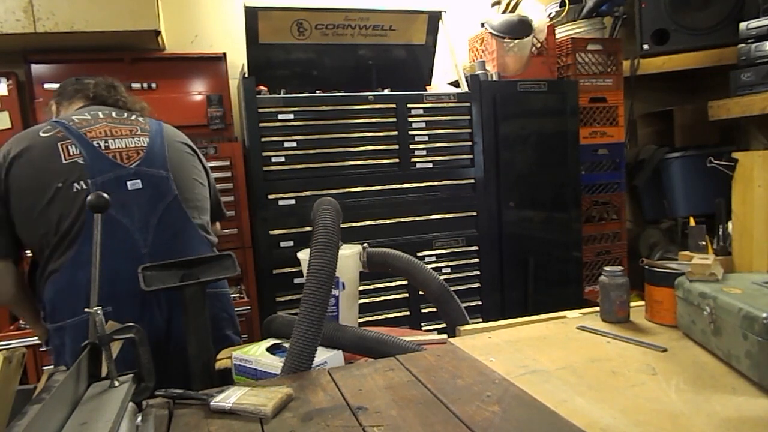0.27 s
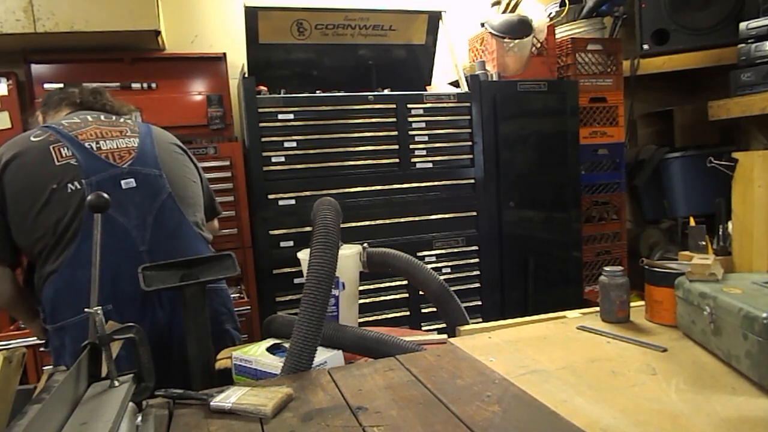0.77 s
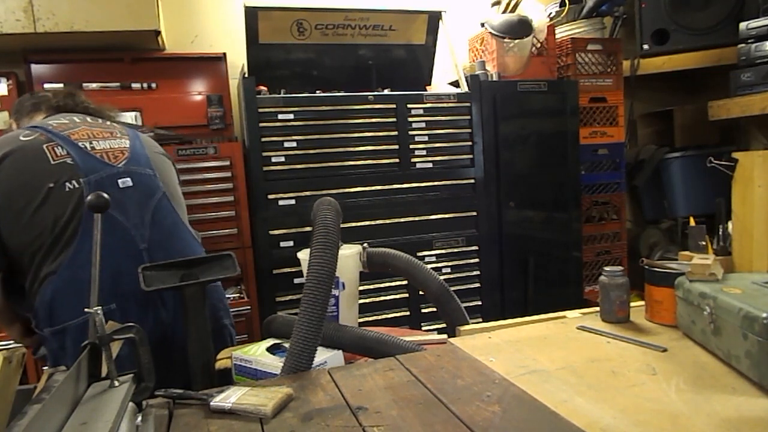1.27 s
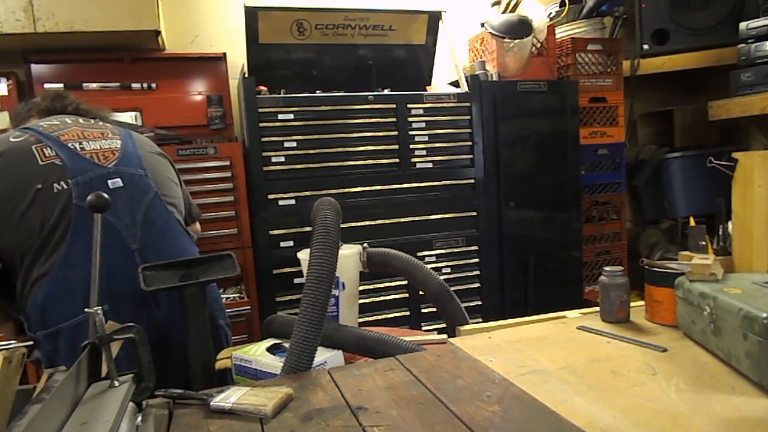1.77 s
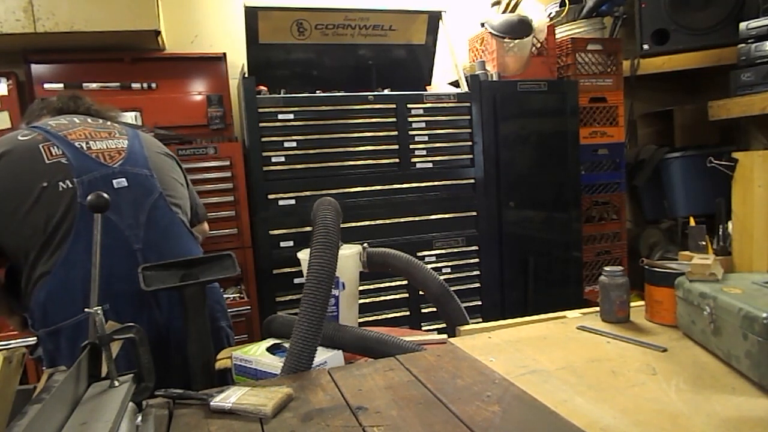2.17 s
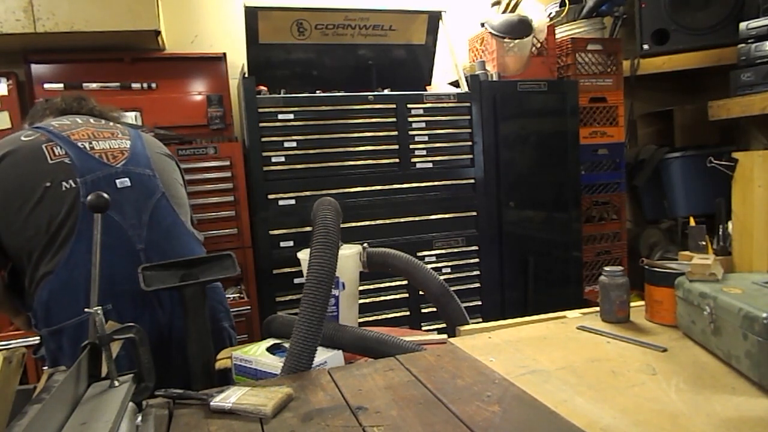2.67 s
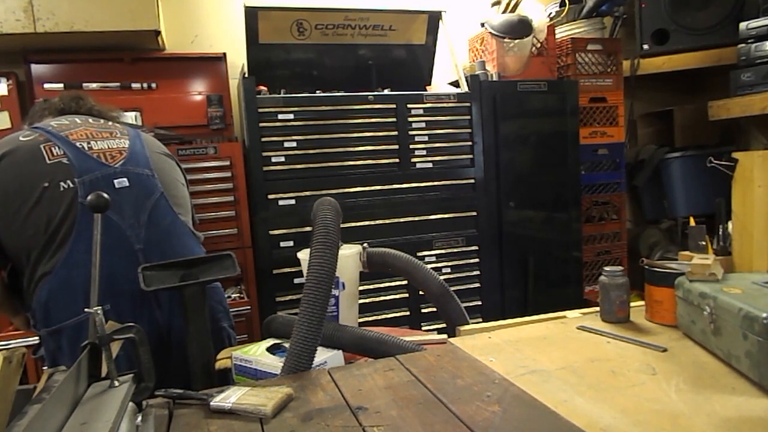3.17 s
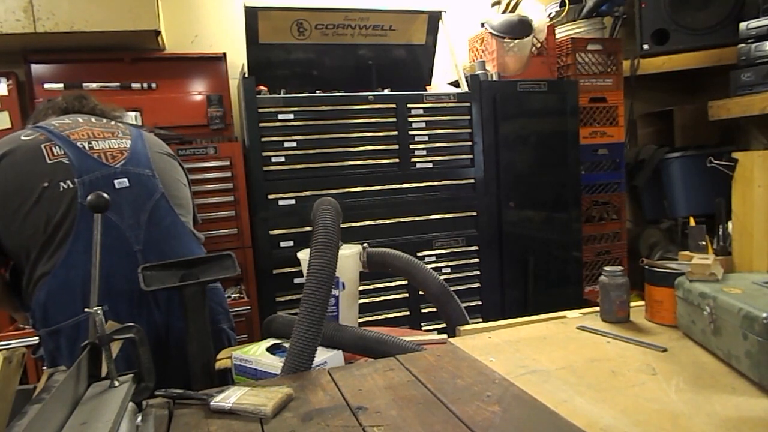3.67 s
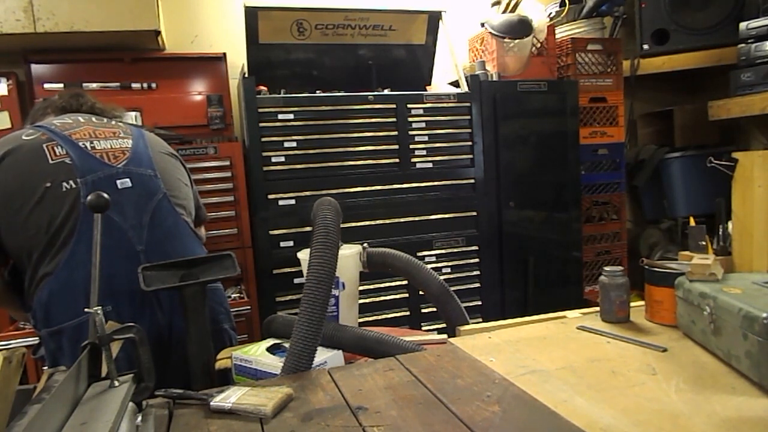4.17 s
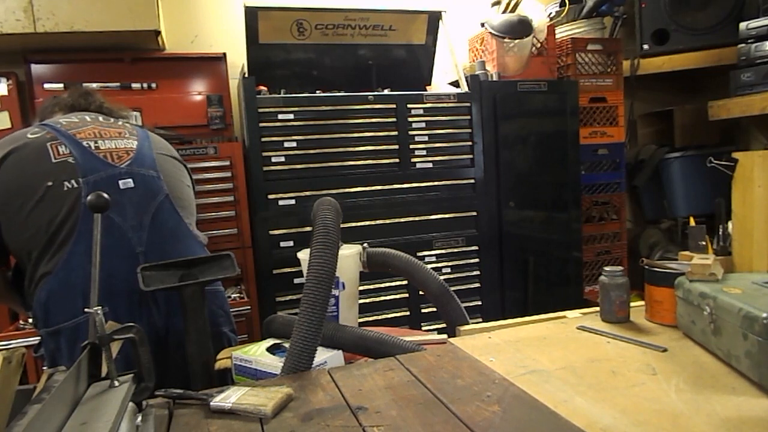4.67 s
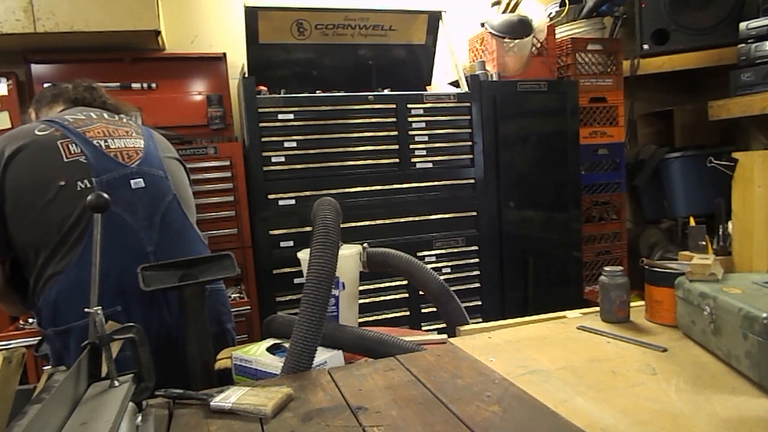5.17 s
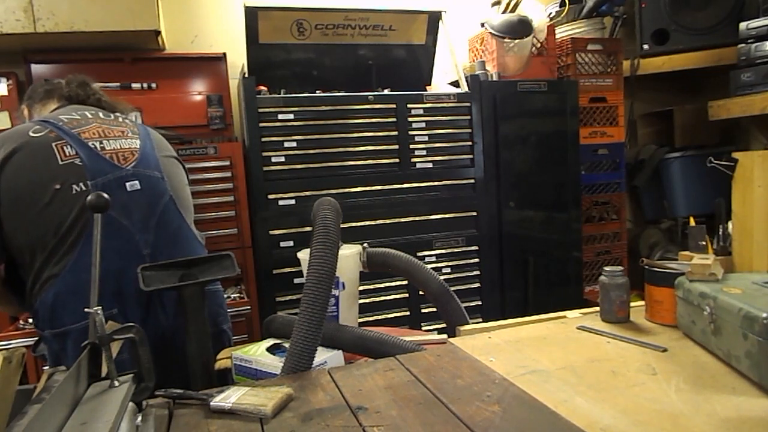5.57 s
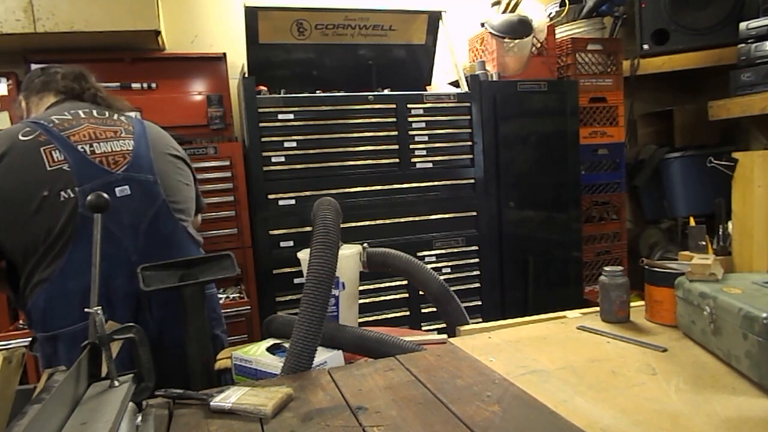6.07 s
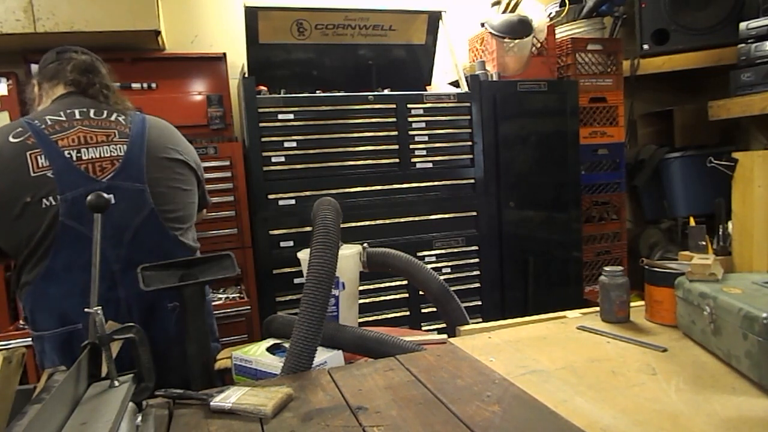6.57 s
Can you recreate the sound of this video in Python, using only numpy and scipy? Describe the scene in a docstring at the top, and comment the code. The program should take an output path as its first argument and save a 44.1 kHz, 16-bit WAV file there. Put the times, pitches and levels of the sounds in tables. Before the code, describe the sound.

Someone sorts metal tools in a steel chest drawer, uneven bursts of clanks and bright chinks, a quiet lull, then a loud closing clatter.

```python
"""A garage, a few metres from a tool chest: steel hand tools are pushed about and dropped in its drawer.
Each knock is a burst of bounces that cracks, scatters, pings and shakes the sheet-metal drawer.
Loose tools and drawer panels ring on as dying sine partials, and a noise tail gives the room.
A thin squeak comes early on; a faint electric hum and coloured fan noise lie below."""
import sys
import numpy as np
from scipy import signal
from scipy.fft import rfft, irfft
from scipy.io import wavfile
from scipy.ndimage import uniform_filter1d, minimum_filter1d

SR = 44100
rng = np.random.default_rng(int(sys.argv[2]) if len(sys.argv) > 2 else 0)


def transcribe(u):
    """Save the signal u as a 16-bit wav file named by the first command-line argument.

    u: samples, shape (n,) or (channels, n), limited to [-1, 1]; the rate is SR.
    q: integer samples, one column per channel.
    """
    v = np.clip(np.atleast_2d(u).T, -1, 1)
    q = np.round(v * 32767).astype(np.int16)
    wavfile.write(sys.argv[1], SR, q)


N = 301312


def from_db(db):
    """Decibels to amplitude gain."""
    return 10 ** (np.asarray(db) / 20)


def unit_energy(x):
    """Scale so that the squares sum to one over time, averaged over the channels."""
    return x / np.sqrt(np.mean(np.sum(x ** 2, axis=-1)) + 1e-20)


def at_hz(points, hz):
    """Read a table on a log-frequency axis."""
    f, value = np.transpose(points)
    return np.interp(np.log(np.maximum(hz, 1)), np.log(f), value)


def dying(t, t60):
    """Amplitude of a free decay that falls 60 dB in t60 seconds."""
    return np.exp(-np.log(1000) * t / t60)


def band_filter(low_hz, high_hz):
    """Causal band-pass, as filter sections."""
    return signal.butter(3, [low_hz, high_hz], "band", fs=SR, output="sos")


def resonate(x, hz, width_hz):
    """Two-pole resonance with gain one on top."""
    r = np.exp(-np.pi * width_hz / SR)
    feed = np.array([1, 0, -1]) * (1 - r * r) / 2
    back = [1, -2 * r * np.cos(2 * np.pi * hz / SR), r * r]
    return signal.lfilter(feed, back, x)


def coloured(x, points):
    """Apply a smooth tone curve of (pitch_hz, level_db) points."""
    size = x.shape[-1]
    hz = np.fft.rfftfreq(size, 1 / SR)
    return irfft(rfft(x) * from_db(at_hz(points, hz)), size)


# likeness of diffuse sound at the two microphones: pitch_hz [Hz], correlation [-1 to 1]
LIKENESS = [(50, .5), (150, 0.91), (500, 0.93), (1000, 0.98), (2000, .35), (4000, 0.25), (8000, 0.25),
            (14000, -0.26)]
# left-right balance of diffuse sound: pitch_hz [Hz], left_minus_right_db [dB]
BALANCE_DB = [(60, 4), (150, -2.5), (1000, -1.84), (4000, -1), (8000, 1), (13000, 3)]


def diffuse_noise(size):
    """Noise from all sides at two close microphones: alike in the bass, unrelated in the treble."""
    hz = np.fft.rfftfreq(size, 1 / SR)
    sides = np.array([[1], [-1]])   # left, right
    alike = np.clip(at_hz(LIKENESS, hz), -.99, .99)
    mid, side = rfft(rng.standard_normal((2, size)))
    both = np.sqrt(1 + alike) * mid + sides * np.sqrt(1 - alike) * side
    balance = from_db(sides * at_hz(BALANCE_DB, hz) / 2)
    return irfft(both * balance, size)


# electric hum partials: pitch_hz [Hz], level_db [dB, before hum_db]
HUM = [(180, -60.5), (300, -58), (540, -73)]
# tone curve of the fan's rush: pitch_hz [Hz], level_db [dB per Hz, relative]
FAN = [(25, -31), (55, -17), (75, -23), (130, -18.5), (200, -13), (290, -1), (400, -5), (550, -0.5),
       (800, -6), (1220, -3), (1600, -13), (3000, -15.5), (10000, -18), (15500, -21.5)]


def background(hum_db=2, fan_db=-51.5):
    """Mains hum is a few steady sines; the soft rush of a fan is coloured diffuse noise (fan_db RMS)."""
    t = np.arange(N) / SR
    hum = sum(from_db(db + hum_db) * np.sin(2 * np.pi * (hz * t + rng.random())) for hz, db in HUM)
    rush = np.sqrt(N) * unit_energy(coloured(diffuse_noise(N), FAN))   # RMS of one
    return hum + from_db(fan_db) * rush


def bounces(t, rattle_s, per_s=230, uneven_db=5.5):
    """Force of a first contact, then of random uneven bounces that die away."""
    touches = rng.random(len(t)) < per_s / SR
    force = touches * from_db(uneven_db * np.clip(rng.standard_normal(len(t)), -2, 1.5))
    force[0] = 1
    return force * np.exp(-t / (2 * max(rattle_s, 1 / SR)))


def crash(t, force, crack_t60=0.0059, crack_db=-11, scatter_t60=0.22, build_s=0.0043):
    """Every contact cracks, then scatters among countless modes of the pile and the cabinets around it."""
    swell = 1 - np.exp(-t / build_s)
    crack = from_db(crack_db) * unit_energy(dying(t, crack_t60) * swell)
    scatter = unit_energy(dying(t, scatter_t60) * swell)
    power = signal.fftconvolve(force ** 2, crack ** 2 + scatter ** 2)[:len(t)]
    return unit_energy(diffuse_noise(len(t)) * np.sqrt(np.maximum(power, 0)))


def pings(t, force, t60=0.112, build_s=0.0055, count=30):
    """Whichever tools touch add a fresh handful of high, quickly damped bar modes."""
    hz = rng.uniform(5800, 15000, (count, 1))
    mix = rng.standard_normal((2, count))   # strength of each mode at each microphone
    envelope = dying(t, t60) * (1 - np.exp(-t / build_s))
    modes = mix @ np.sin(2 * np.pi * hz * t) * envelope
    return unit_energy(signal.fftconvolve(force[None], modes, axes=1)[:, :len(t)])


# knocks that stand out: start_s [s], strength_db [dB], brightness_db [dB, tilt from boom to chink],
# rattle_s [s, time in which the bounces' power falls to 1/e]
KNOCKS = [(0.292, -28.5, 8.5, .011), (0.38, -38.5, 16, .045), (0.468, -19.5, 18.5, 0.0046),
          (0.474, -15.5, 22, 0.01), (0.558, -22.5, 25.5, 0.023), (1.308, -34.5, 9.5, 0.036),
          (1.37, -32, 4, 0.013), (1.425, -19, 8.5, 0.14), (1.455, -24.5, 22, 0.048),
          (1.534, -16.5, 11, 0.026), (1.595, -20, 19, 0.01), (1.62, -21.5, 14, .006),
          (1.775, -27.5, 9.5, 0.034), (1.82, -27.5, 12.5, 0.0084), (1.93, -31.5, 6.5, 0.053),
          (2.12, -37, 11.5, .004), (2.24, -35.5, 5.5, 0.012), (2.457, -27, 11.5, 0.0089),
          (2.737, -28.5, 11.5, 0.017), (2.754, -26, 8.5, 0.02), (2.876, -31, 16, .03),
          (2.915, -26, 11, 0.014), (3.015, -19, 15, 0.018), (3.051, -20, 20.5, 0.024),
          (3.104, -16, 13, 0.0043), (3.203, -22.5, 20, .012), (3.411, -23, 10.5, 0.051),
          (3.523, -21, 17, 0.014), (3.608, -24.5, 20, .015), (3.63, -21.5, 17.5, 0.013),
          (3.764, -26.5, 12.5, 0.0074), (3.911, -34.5, 18, 0.011), (3.985, -30, 9, 0.0068),
          (4.148, -39.5, 5, .004), (4.725, -38, -0.5, 0.012), (4.873, -38, 1, .003), (4.973, -39, 0, .011),
          (5.028, -38.5, 4, 0.0081), (5.106, -40.5, 9, 0.0046), (5.232, -42.5, -2, 0.0069),
          (5.35, -28.5, 12, 0.0088), (5.552, -36, 3, 0.0026), (5.708, -23.5, 4, 0.022),
          (5.853, -22.5, 12.5, 0.016), (5.98, -32.5, -2, 0.023), (6.087, -26.5, 12.5, 0.033),
          (6.19, -32, 13.5, .05), (6.25, -36, 28, 0.033), (6.308, -21, 16, 0.039), (6.379, -17.5, 8, 0.011),
          (6.417, -11.5, 13.5, .007), (6.48, -16.5, 8, .037), (6.538, -15, 24.5, 0.023),
          (6.59, -19, 13, .029), (6.65, -22.5, 22.5, 0.029)]
# ranges of boom, clank, clack and chink: low_hz [Hz], high_hz [Hz]
RANGES = [(200, 600), (600, 1500), (1500, 5000), (5000, 15500)]
# how strength is shared out, boom to chink: offset_db [dB], share [dB per dB of brightness]
WEIGHTS = [(-.5, -0.39), (0, -0.14), (0.54, 0.13), (0.07, 0.48)]
# resonances of the loaded drawer: pitch_hz [Hz], width_hz [Hz], level_db [dB, against the direct clatter]
DRAWER = [(256, 23, -1.5), (293.3, 21.6, 2), (351, 38, -7), (515, 160, -13.5), (977, 150, -12),
          (1120, 96, -9), (4103, 52, 0), (4560, 37, -9), (8750, 450, -6.5)]
# tone of the clatter at the microphones: pitch_hz [Hz], level_db [dB]
TONE = [(100, -21), (170, -11.5), (240, -3.5), (520, .5), (680, 0.5), (950, 3), (1250, 1), (1450, 0),
        (1900, 2.5), (2900, 0), (4500, 1.5), (5200, -1.5), (7000, 1), (10500, -3), (12500, -5.5),
        (15500, -13.5)]


def clatter(blow_s=0.02, ping_db=-5):
    """Bounces drive tools and drawer; steel on steel is bright, a blow on the drawer floor is dull."""
    t = np.arange(SR // 4) / SR
    filters = [band_filter(low, high) for low, high in RANGES]
    out = np.zeros((2, N + SR))
    for start_s, strength_db, bright_db, rattle_s in KNOCKS + jostles():
        force = bounces(t, rattle_s)
        tools = crash(t, force) + from_db(ping_db) * pings(t, force)
        drawer = sum(from_db(db) * resonate(tools, hz, width) for hz, width, db in DRAWER)
        shaken = tools + drawer
        at = int(start_s * SR)
        for sos, (offset_db, share) in zip(filters, WEIGHTS):
            # each range gets the energy of a steady sound blow_s long
            gain = from_db(strength_db + offset_db + share * bright_db) * np.sqrt(blow_s * SR)
            out[:, at:at + len(t)] += gain * unit_energy(signal.sosfilt(sos, shaken))
    return coloured(out[:, :N], TONE)


# reverberation of the garage: pitch_hz [Hz], t60_s [s]
GARAGE_T60 = [(200, 0.51), (500, 0.75), (1000, 0.64), (3000, 0.59), (6000, 0.52), (14000, 0.34)]


def garage(x, tail_db=-4, build_s=0.004, late_samples=3):
    """The room adds a tail of dying noise bands; sound reaches the right microphone slightly late."""
    t = np.arange(SR) / SR
    noise = diffuse_noise(SR)
    edges = np.geomspace(100, 18000, 9)
    tail = 0
    for low, high in zip(edges, edges[1:]):
        fade = dying(t, at_hz(GARAGE_T60, np.sqrt(low * high)))
        tail = tail + signal.sosfilt(band_filter(low, high), noise) * fade
    tail = unit_energy(tail * (1 - np.exp(-t / build_s)))
    reverb = signal.fftconvolve(x[:1], tail, axes=1)[:, :N]
    left, right = x + from_db(tail_db) * reverb
    return np.array([left, np.pad(right, (late_samples, 0))[:N]])


# Partials of tools and drawer panels that ring out freely.
# Columns of each: pitch_hz [Hz], level_db [dB, before the ring's gain_db]
# a dropped wrench
DROPPED_WRENCH = [(4151, -33), (5868, -36), (7014, -40), (8140, -30), (8247, -38), (8834, -36), (8963, -32),
                  (9367, -38), (9997, -40), (10255, -32), (10670, -31), (10783, -33), (12247, -42),
                  (12769, -40)]
# a small bit
SMALL_BIT = [(10061, -46), (10471, -44.5), (11122, -53)]
# a tapped shank
TAPPED_SHANK = [(4522, -39.5), (8818, -46), (9345, -64), (11843, -51)]
# a tossed wrench
TOSSED_WRENCH = [(2083, -35), (8608, -45), (9378, -36), (9927, -32), (10115, -43), (10788, -39),
                 (14277, -41)]
# a slim wrench
SLIM_WRENCH = [(6148, -44), (9502, -34), (9609, -38), (10788, -40), (11326, -48.5), (14277, -36)]
# a rolling socket
ROLLING_SOCKET = [(5819, -32), (7025, -48), (8603, -40), (10481, -19.5), (12037, -25), (13625, -54)]
# a small socket
SMALL_SOCKET = [(4247, -54), (7278, -59), (8786, -42), (8899, -46), (10874, -56), (12059, -52),
                (12107, -48)]
# a nudged bit
NUDGED_BIT = [(8355, -47.5)]
# a short wrench
SHORT_WRENCH = [(7784, -46), (9765, -41), (11176, -44), (11283, -47), (11682, -57)]
# a lifted shank
LIFTED_SHANK = [(4500, -52.5), (4667, -63)]
# a shifted socket
SHIFTED_SOCKET = [(4102, -39.5), (6772, -46), (9895, -37), (9927, -45)]
# a heavy tool
HEAVY_TOOL = [(893.6, -18), (1647, -28), (1712, -26), (2347, -23), (2412, -40), (3338, -40), (4011, -23.5),
              (4091, -19.5), (4522, -45)]
# the last wrench
LAST_WRENCH = [(4667, -35), (6525, -37), (6853, -32), (7730, -34), (9141, -33), (9577, -27), (10734, -36),
               (11095, -39), (12204, -33)]
# the drawer's floor
DRAWER_FLOOR = [(355.3, -37), (425.3, -55)]
# the drawer's wall
DRAWER_WALL = [(403.7, -33), (511.4, -27.5), (592.2, -29)]
# the drawer's side
DRAWER_SIDE = [(805, -44.5), (898, -40), (1025, -41.5)]
# the drawer's rail
DRAWER_RAIL = [(985, -38.5), (1098, -39), (1222, -34), (1303, -34.5)]
# the drawer's front
DRAWER_FRONT = [(301.5, -41), (344.5, -48)]
# a long bar
LONG_BAR = [(1308, -34), (1421, -37), (1696, -39), (1776, -37), (2083, -35), (2283, -40)]
# a bumped socket
BUMPED_SOCKET = [(4506, -25.5), (6385, -41), (8624, -39), (10422, -40), (12990, -34)]
# light pliers
LIGHT_PLIERS = [(2681, -62), (3133, -56.5), (4511, -62)]
# a long wrench
LONG_WRENCH = [(4522, -42), (4560, -46), (4667, -44)]
# when each one rings: start_s [s], partials [table above], gain_db [dB], t60_s [s]
RINGS = [(0.293, DRAWER_FLOOR, 9.5, 0.41), (0.472, DROPPED_WRENCH, 18, 0.54),
         (1.605, DRAWER_WALL, 7.5, 0.4), (2.123, SMALL_BIT, 11, .42), (2.245, LONG_WRENCH, -6, .5),
         (2.456, TAPPED_SHANK, 8.5, 0.52), (2.458, LONG_WRENCH, 8, 0.51), (2.915, DRAWER_SIDE, 14, 0.27),
         (3.016, DRAWER_FRONT, 17.5, 0.29), (3.05, TOSSED_WRENCH, 12, 0.72), (3.103, LONG_BAR, 14.5, 0.33),
         (3.105, DRAWER_RAIL, 16, 0.32), (3.205, DRAWER_RAIL, 13, 0.26), (3.206, SLIM_WRENCH, 15, 0.43),
         (3.526, BUMPED_SOCKET, 4, 0.43), (3.627, ROLLING_SOCKET, 4, 0.73), (3.986, SMALL_SOCKET, 17, 0.44),
         (3.99, LONG_WRENCH, 4, .5), (4.736, NUDGED_BIT, 11, 0.47), (4.874, DRAWER_SIDE, 3.5, 0.46),
         (5.108, LIGHT_PLIERS, 13, 0.56), (5.352, DRAWER_FRONT, 11, 0.24), (5.353, SHORT_WRENCH, 14, 0.44),
         (5.553, LIFTED_SHANK, 18, 0.32), (5.87, SHIFTED_SOCKET, 13.5, 0.46), (6.418, HEAVY_TOOL, 7, 0.26),
         (6.42, DRAWER_RAIL, 23.5, 0.25), (6.577, LAST_WRENCH, 13.5, 0.8), (6.592, LONG_WRENCH, 19, 0.64)]


def free_rings(swell_s=0.0012, waver=0.53, knots_per_s=35):
    """Tools and panels ring on; reflections make partials waver, high ones differently at each microphone."""
    t = np.arange(SR * 3 // 4) / SR
    out = np.zeros((2, N + SR))
    knots = np.arange(64)
    for start_s, partials, gain_db, t60 in RINGS:
        at = int(start_s * SR)
        fade = dying(t, t60) * (1 - np.exp(-t / swell_s))
        for hz, db in partials:
            tone = from_db(db + gain_db) * fade * np.exp(2j * np.pi * hz * t)
            path = None
            for channel in out:
                if path is None or at_hz(LIKENESS, hz) < .5:   # long waves reach both microphones alike
                    echoes = rng.standard_normal(len(knots)) + 1j * rng.standard_normal(len(knots))
                    direct = np.exp(2j * np.pi * rng.random())
                    path = (direct + waver * echoes) / np.sqrt(1 + waver ** 2)
                channel[at:at + len(t)] += np.real(tone * np.interp(t * knots_per_s, knots, path))
    return out[:, :N]


# a faint thin squeak: start_s [s], end_s [s], pitch_hz [Hz], level_db [dB, peak]
SQUEAK = [(0.85, 1.006, 3830, -53), (0.86, 1.006, 3450, -59)]


def squeak(waver_hz=8):
    """Thin, slightly unsteady tones that swell and fade."""
    out = np.zeros(N)
    for start_s, end_s, hz, db in SQUEAK:
        size, at = int((end_s - start_s) * SR), int(start_s * SR)
        drift = np.interp(np.linspace(0, 9, size), np.arange(10), rng.standard_normal(10))
        pitch = hz + waver_hz * drift
        tone = np.sin(2 * np.pi * np.cumsum(pitch) / SR)
        out[at:at + size] += from_db(db) * np.sqrt(np.hanning(size)) * tone
    return out


# the hand moves through the pile and jostles it: start_s [s], end_s [s], touch_db [dB, mean strength]
RUMMAGING = [(1.8, 2.08, -43.5), (2.781, 3.18, -38), (3.44, 3.84, -40), (4.83, 4.95, -41.5),
             (5.604, 5.7, -43)]


def jostles(gap_s=.055, rattle_s=0.016, spread_db=0.5, even_db=-41.5, brighter_per_db=0.3):
    """Light touches at uneven intervals while the hand moves, as rows like the knocks; firmer is brighter."""
    rows = []
    for start_s, end_s, touch_db in RUMMAGING:
        s = start_s
        for gap, spread in rng.uniform(-1, 1, (16, 2)):
            if s < end_s:
                strength_db = touch_db + spread_db * spread
                bright_db = brighter_per_db * (strength_db - even_db)   # no tilt at even_db
                rows.append((s, strength_db, bright_db, rattle_s))
            s += gap_s * (1 + gap / 2)
    return rows


def scene():
    """The clatter in the garage, free rings and squeak over the steady background."""
    return background() + squeak() + free_rings() + garage(clatter())


def record(dry, limit_db=2.2, hold_samples=260, cutoff_hz=15650):
    """A fast limiter holds the crashes, what is left above full scale clips; the top is cut."""
    gain = np.minimum(1, from_db(limit_db) / (np.abs(dry).max(axis=0) + 1e-9))
    held = dry * uniform_filter1d(minimum_filter1d(gain, hold_samples), hold_samples)
    clipped = np.clip(held, -1, 1)
    top_cut = signal.ellip(10, .2, 70, cutoff_hz, fs=SR, output="sos")
    return signal.sosfilt(top_cut, clipped)


dry = scene()
out = record(dry)
transcribe(out)
```